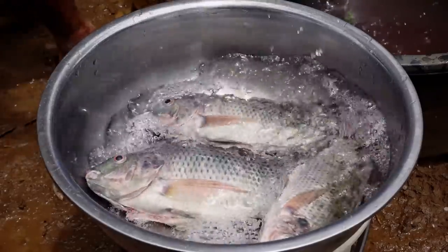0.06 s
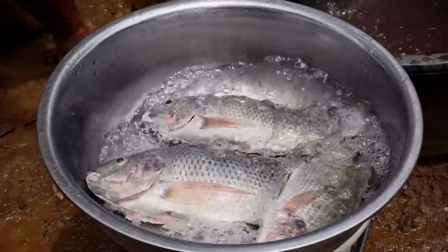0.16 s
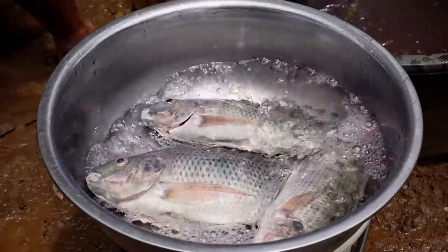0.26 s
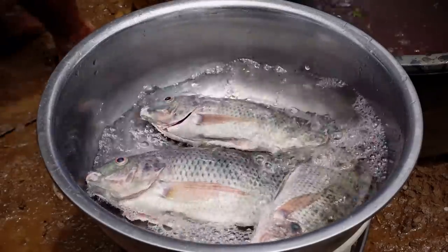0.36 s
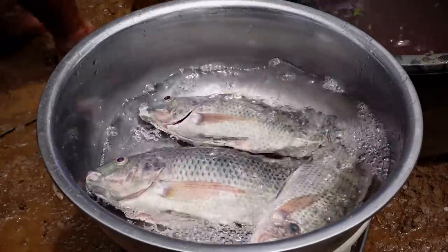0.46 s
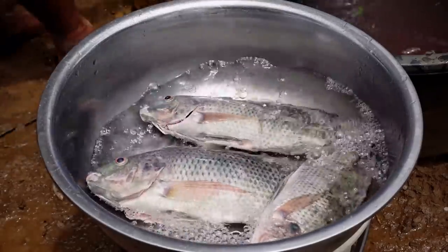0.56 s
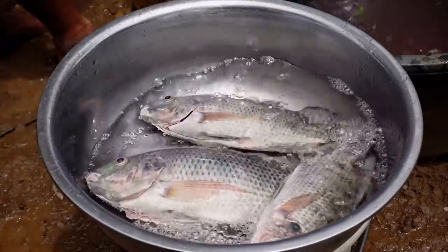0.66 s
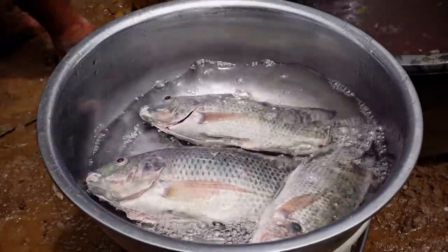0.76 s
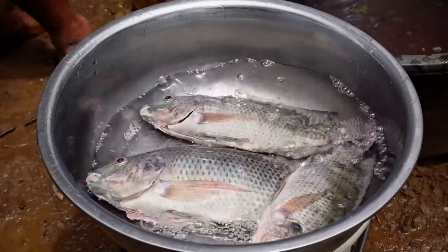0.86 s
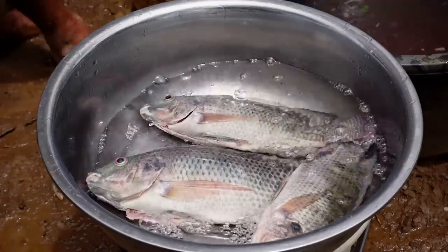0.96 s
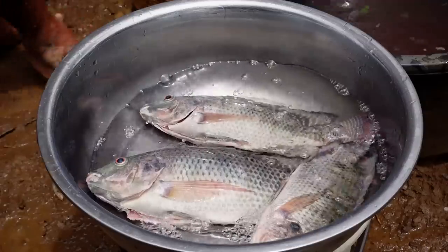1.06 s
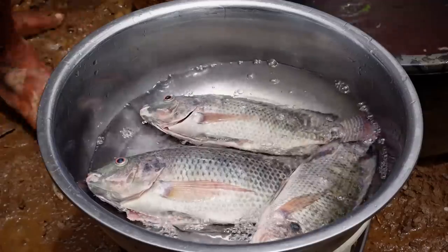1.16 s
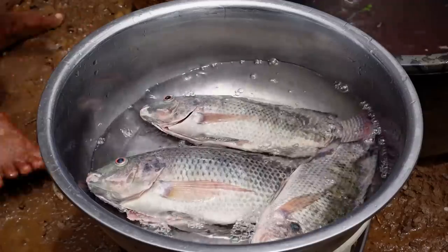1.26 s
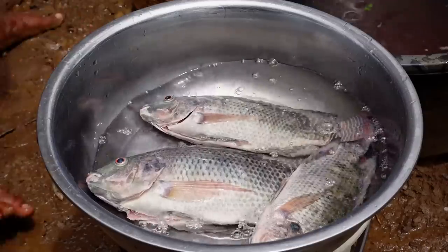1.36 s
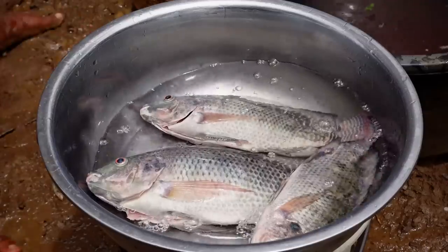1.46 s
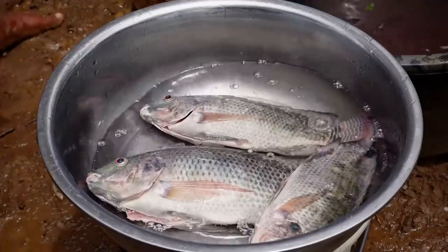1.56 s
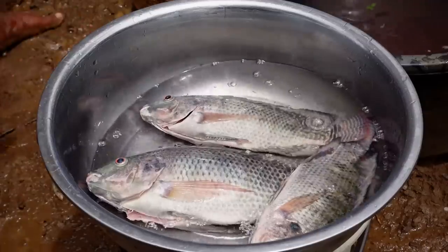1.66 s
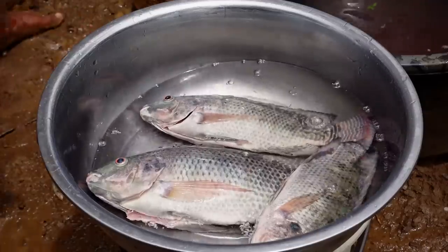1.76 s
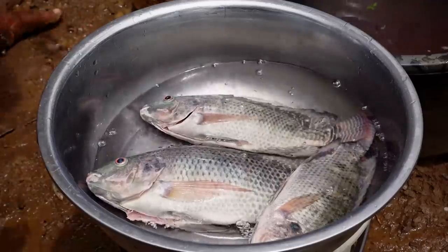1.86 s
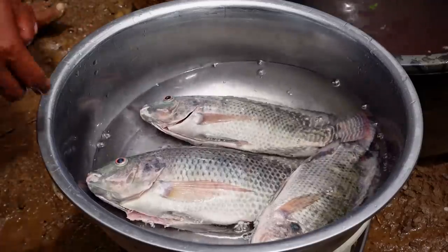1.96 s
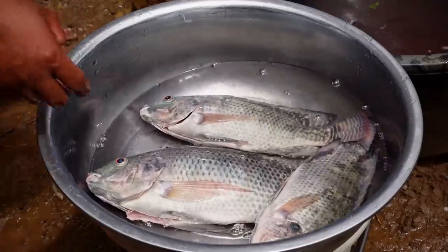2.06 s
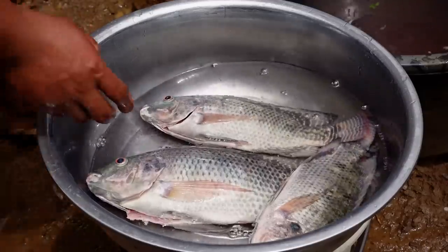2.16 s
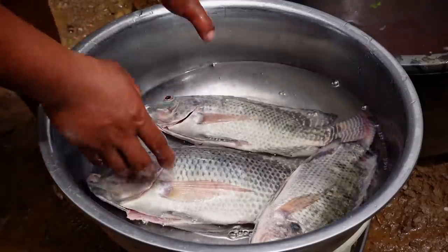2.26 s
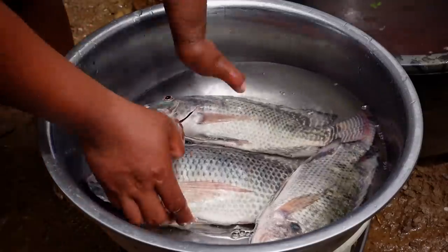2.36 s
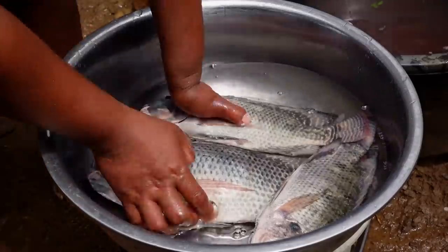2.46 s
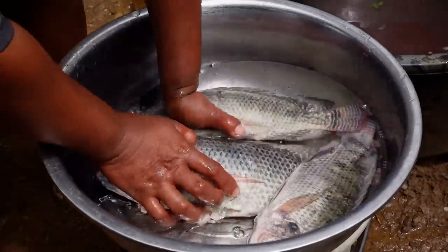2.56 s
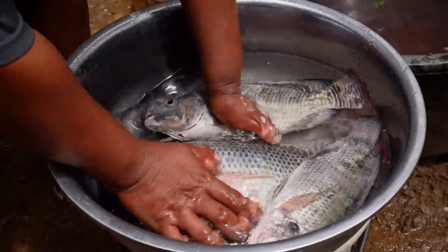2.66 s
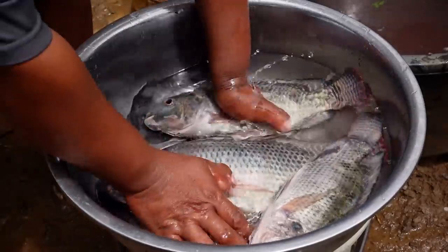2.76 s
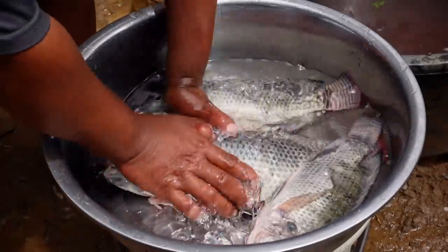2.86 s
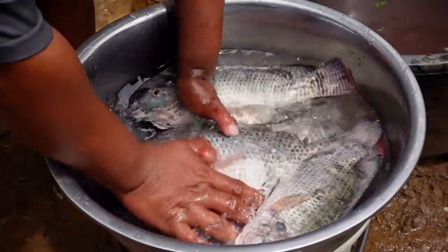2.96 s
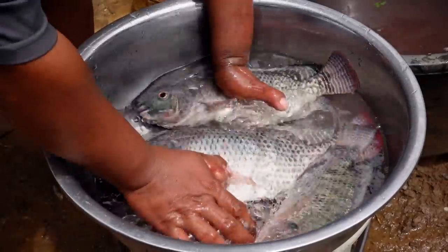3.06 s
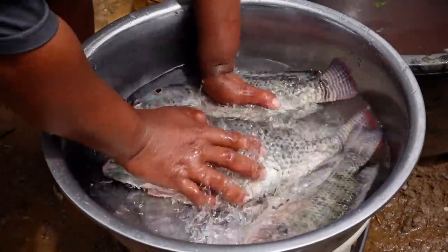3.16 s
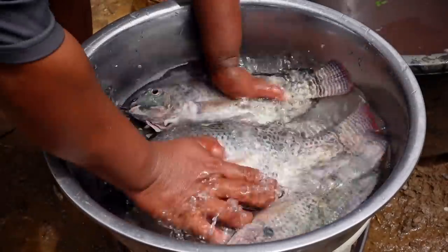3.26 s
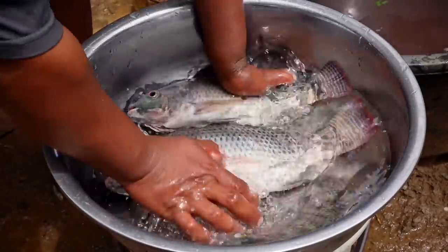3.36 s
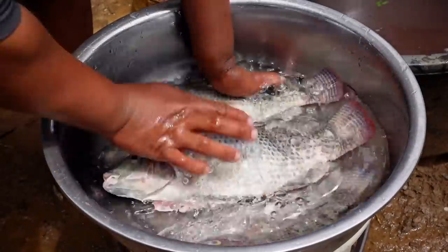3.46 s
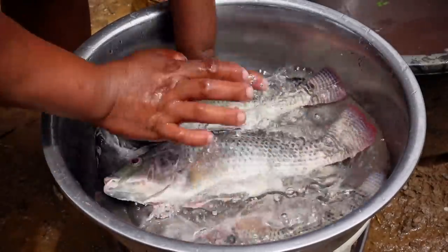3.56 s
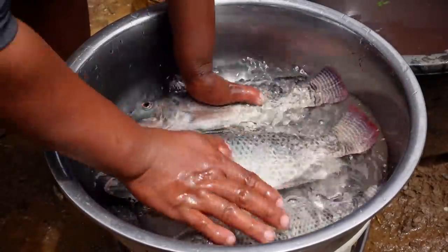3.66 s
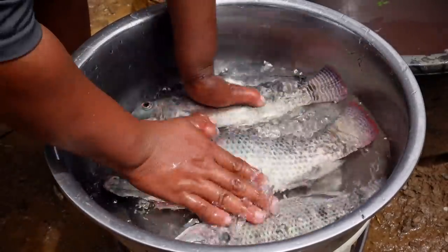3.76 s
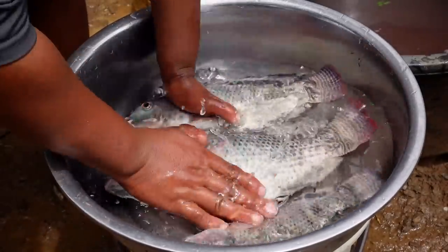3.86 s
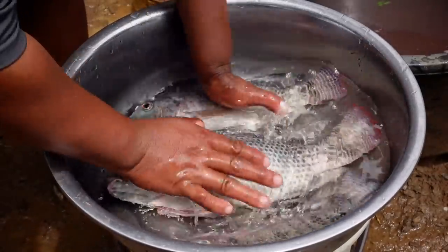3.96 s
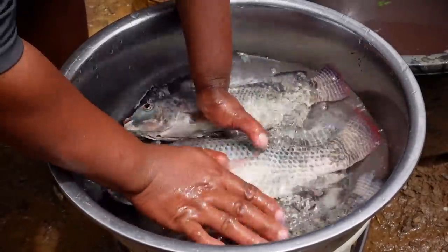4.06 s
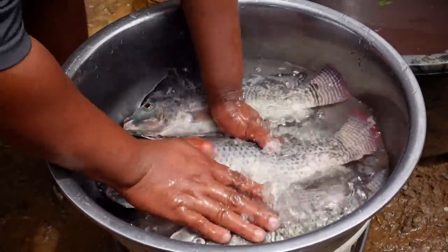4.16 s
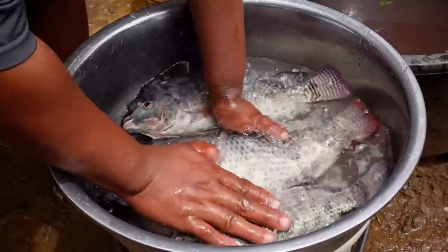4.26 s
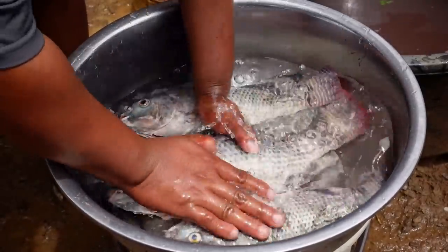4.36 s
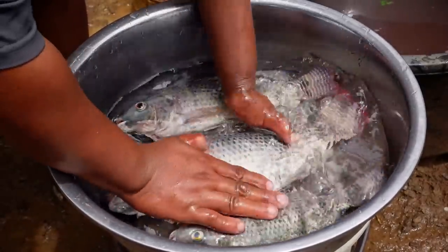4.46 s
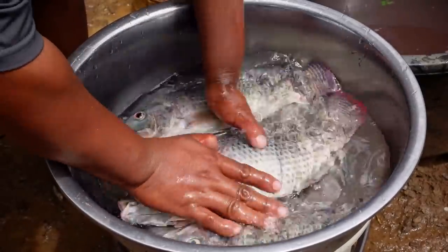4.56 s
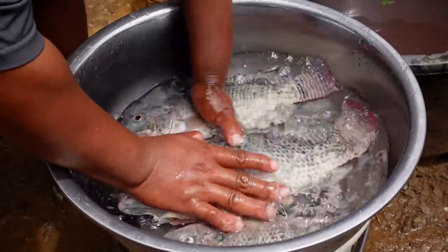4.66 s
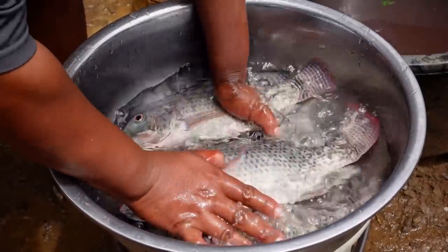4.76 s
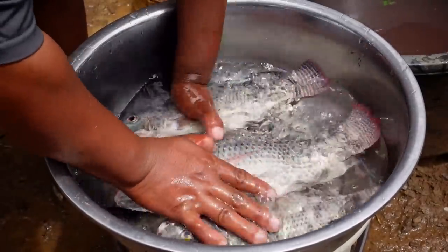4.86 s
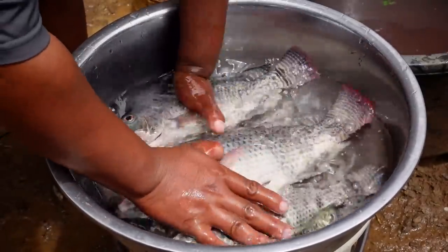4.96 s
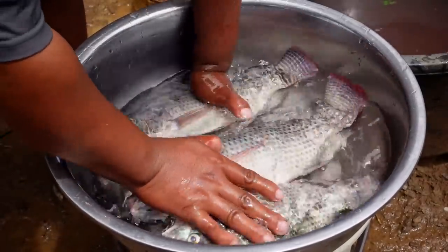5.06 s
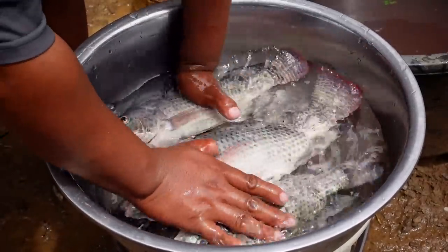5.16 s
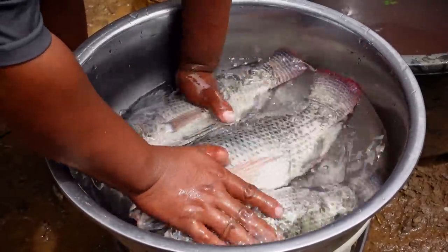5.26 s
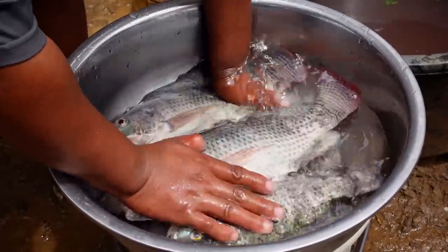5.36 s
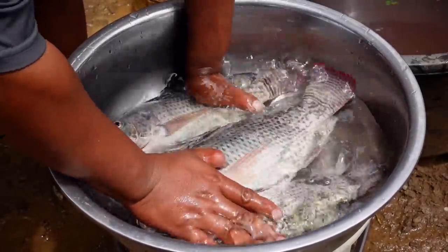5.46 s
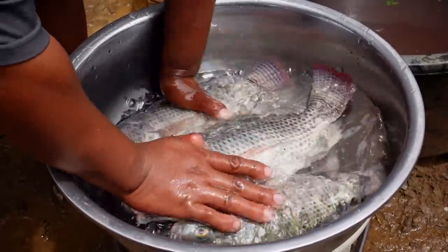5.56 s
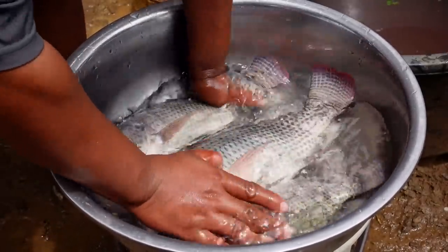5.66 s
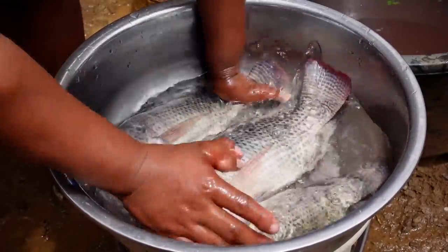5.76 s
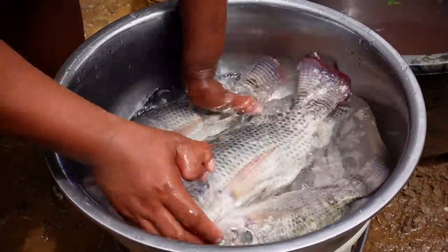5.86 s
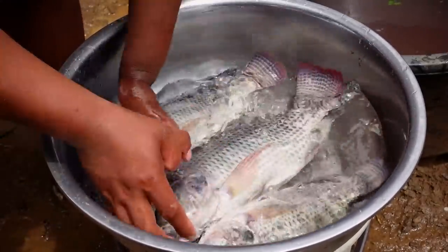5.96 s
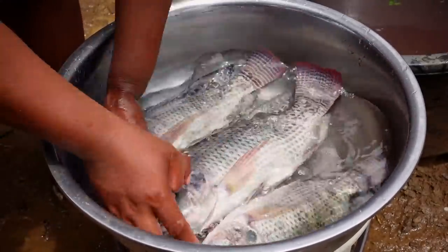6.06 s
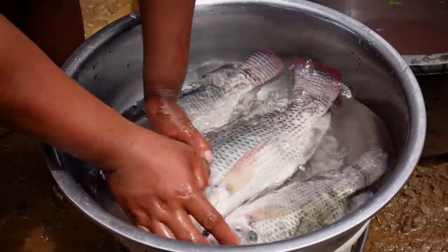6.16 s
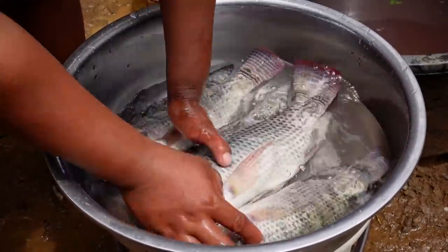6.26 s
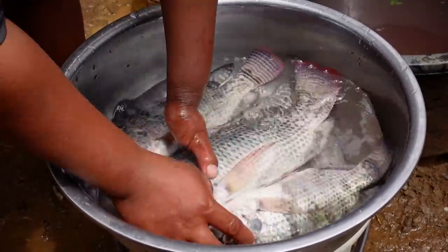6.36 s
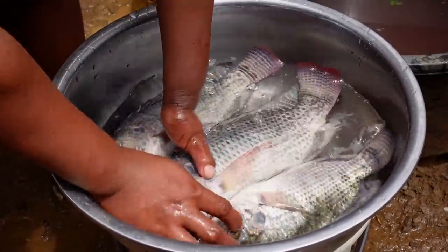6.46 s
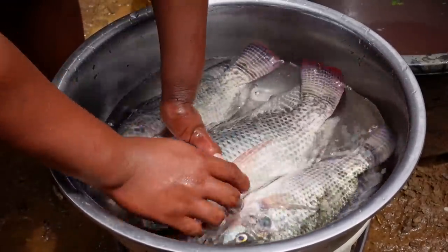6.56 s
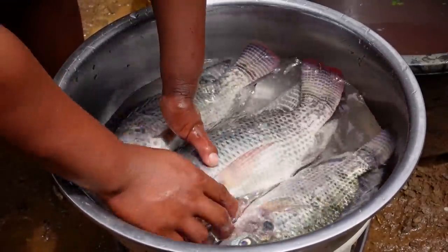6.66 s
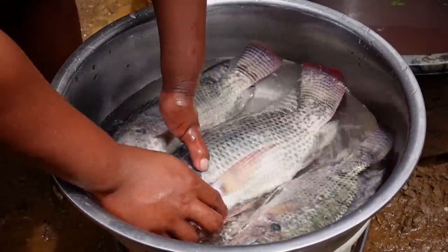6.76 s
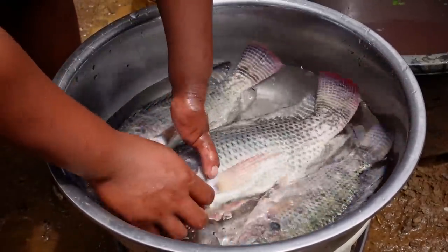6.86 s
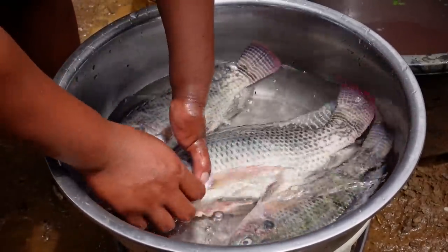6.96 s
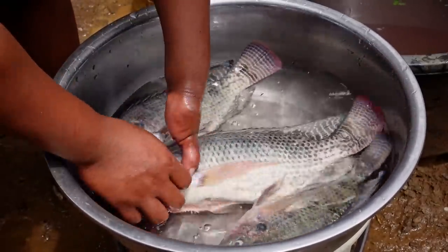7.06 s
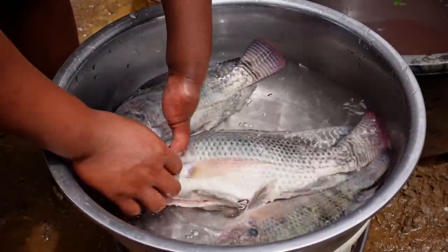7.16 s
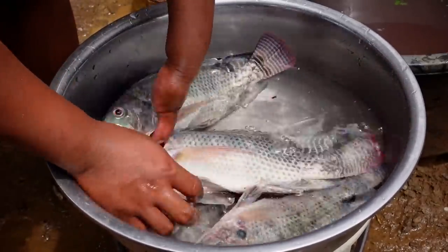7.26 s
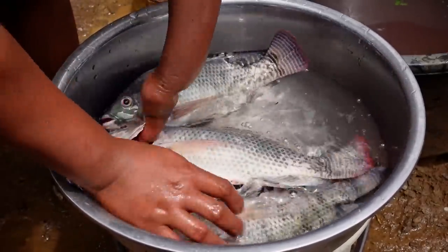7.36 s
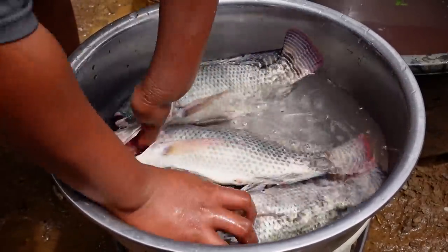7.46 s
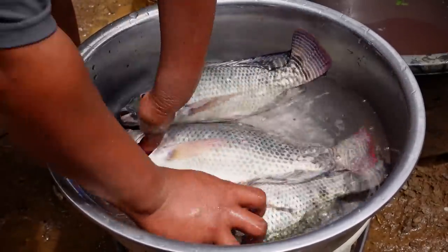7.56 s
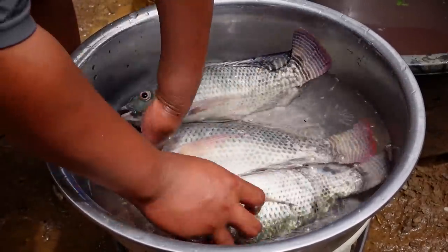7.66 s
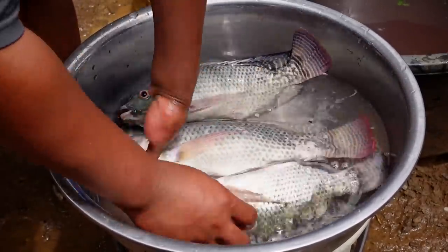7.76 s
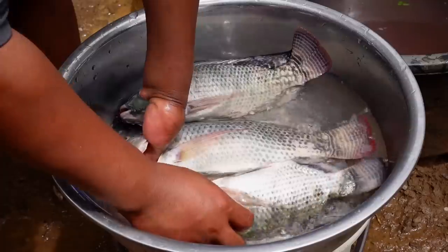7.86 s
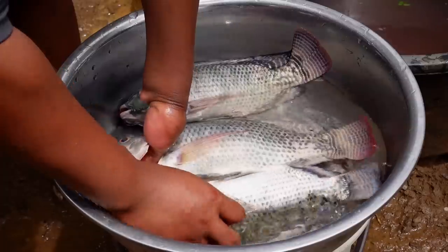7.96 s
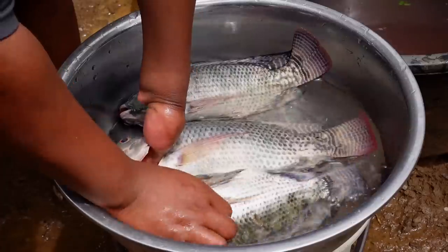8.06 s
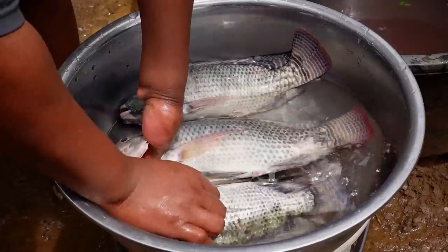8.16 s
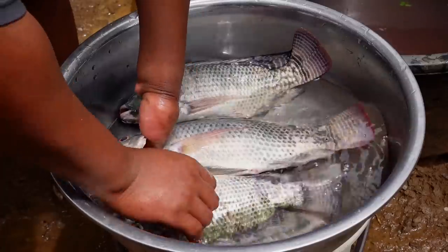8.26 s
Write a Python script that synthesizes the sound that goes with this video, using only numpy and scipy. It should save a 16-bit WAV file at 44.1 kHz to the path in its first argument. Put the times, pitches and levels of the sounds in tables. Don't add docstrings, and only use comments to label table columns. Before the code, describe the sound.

Wet slaps, bubbly splashes and plinking drips in a metal basin right at the microphone, while a rooster crows hoarsely nearby and a chick peeps.

```python
import sys
import numpy as np
from scipy import signal
from scipy.fft import rfft, irfft, next_fast_len
from scipy.io import wavfile
from scipy.ndimage import uniform_filter1d, minimum_filter1d, map_coordinates

SR = 44100
rng = np.random.default_rng(int(sys.argv[2]) if len(sys.argv) > 2 else 0)


def amp(db):
    return 10 ** (np.asarray(db, float) / 20)


def write(x):
    x = np.atleast_2d(x).T
    wavfile.write(sys.argv[1], SR, np.round(np.clip(x, -1, 1) * 32767).astype(np.int16))


N = 366471

# (frequency [Hz], density [dB per Hz])
RUMBLE = [(25, -45), (120, -22), (250, -6), (550, -2), (1300, -6), (2300, -11), (4000, -40)]
TRICKLE = [(350, -30), (700, -2), (1750, -2.5), (4000, -2.5), (9240, -15), (16000, -29)]
# (frequency [Hz], likeness [0-1])
ALIKE = [(60, .7), (400, .62), (1500, .84), (4000, .94), (15000, .98)]
# (frequency [Hz], t60 [s])
WALLS = [(500, .5), (2000, .35), (10000, .12)]
RUMBLE_DB, WATER_DB, POUR_DB, SETTLE_S = -54.5, -43.5, 8, .5
TURN_DOWN_S, TURN_DOWN_DB, FADE_DB_PER_S = 7.235, 6.5, 2.5
FOAM_DB, FOAM_LOSS_DB_PER_S, FOAM_HZ = -42, 2.1, 7500

# (time [s], level [dB])
PEEPS = [
    (.36, -41),
    (.79, -43),
    (6.2, -37.5),
    (6.68, -39),
    (7.09, -43),
    (7.54, -50),
    (7.98, -48),
]
PEEP_S, PEEP_HZ, PEEP_FALL_HZ, PEEP_TURN = .22, 4150, 420, .4

# (time [s], pitch [Hz], effort [dB], beak opening as second partial lift [dB])
CROW = [
    [(4.134, 586, -24, 1), (4.15, 610, -20, -1), (4.172, 705, -18, 0), (4.215, 760, -19, -1),
     (4.245, 710, -20, 4), (4.3, 685, -20, 4), (4.36, 700, -27, 12), (4.385, 700, -33, 8),
     (4.459, 660, -37, 6)],
    [(4.46, 575, -27, 2), (4.49, 800, -21, 13), (4.54, 840, -21, 15), (4.63, 825, -23, 7),
     (4.645, 785, -16, 5), (4.73, 780, -16, 7), (4.89, 756, -16, 7), (5.01, 750, -17, 9),
     (5.115, 725, -23, 6)],
    [(5.12, 800, -27, 4), (5.29, 780, -28, 5)],
    [(5.296, 678, -22, 1), (5.31, 688, -17, 3), (5.355, 712, -17, 2), (5.42, 712, -19, 4),
     (5.5, 697, -22, 3), (5.62, 674, -15, -9), (5.712, 638, -19, -13)],
    [(5.716, 540, -28, 0), (5.78, 505, -28, 4), (5.83, 497, -33, 2), (5.91, 485, -55, 0)],
]
# (time [s], hoarseness [0-1], flutter depth [0-1])
VOICE = [(4.13, .28, .2), (4.22, .27, .3), (4.26, .35, .9), (4.33, .35, .4), (4.37, .2, .3), (4.5, .27, .8),
         (4.6, .33, .6), (4.65, .12, .55), (4.72, .12, .6), (4.84, .25, .8), (4.89, .11, .85),
         (5.04, .12, .8), (5.08, .5, .6), (5.31, .24, .5), (5.41, .13, .2), (5.67, .07, .15),
         (5.73, .36, .3), (5.85, .27, .2)]
# (time [s], half length [s], hoarseness [0-1])
CRACKS = [
    (4.143, .018, .45),
    (4.295, .06, .6),
    (4.41, .045, .8),
    (4.485, .045, .55),
    (4.61, .04, .7),
    (4.79, .055, .55),
    (5.195, .105, .95),
]
# (frequency [Hz], gain [dB])
THROAT = [(1500, 5), (2100, -2), (2740, -5), (3020, 0), (3900, -8), (4700, -1), (5400, -7), (6200, -5),
          (7700, -6), (9000, -16), (14000, -40)]
# (frequency [Hz], density [dB per Hz])
BREATH = [(1180, -50), (2000, -20), (2190, -8), (3020, -22), (3640, 1), (4020, -13), (4610, 0), (5470, -14),
          (11000, -31), (14300, -52), (22000, -120)]
CHAOS = [(430, -60), (520, -7), (800, -5), (1050, 1), (1700, -3), (2200, -6), (2800, -5), (4400, -26)]
# (frequency [Hz], left minus right [dB])
BIRD_SIDE = [(200, -2), (700, -7.5), (1290, 0), (4400, -.8)]
OVERTONES_DB = [-24, -25, -31, -27.5, -35]
SHEEN_DB = [-10, -3, -6, -5, -8]
RASP_DB = [10, 4, 0, 1, 2]
HOLLOW_DB = [-2, -1, 0, -4, -3]
LOW_VOICE_DB = [-1, -3, -14]
LOW_VOICE_HZ, LOW_SPREAD_HZ = 615, 80
SHEEN_HZ, HOLLOW_HZ = (5300, 6500), (2200, 2600, 4300, 4600)
FOLLOW, BEAK_BRIGHTENS = .6, .3
CRACK_LOSS_DB, HALF_SHARE = 4, .7
FLUTTER_HZ, FLUTTER_BLUR = 41, .6
CHAOS_DB, THROAT_FLOOR_HZ = -1.5, 480
LINGER_S, LINGER_HZ, LINGER_DB = (5.705, 5.765, 5.87), (642, 615), (-18, -23, -42)

# (frequency [Hz], level [dB], t60 [s])
BASIN = [(392, -3, .13), (416, -3, .2), (560, -11, .12), (640, -9, .2), (705, -10, .18), (840, -8, .22),
         (945, -6, .07), (1065, -14, .2), (1325, -13, .25), (1745, -11, .15), (2250, -16, .1),
         (2700, -12, .2), (3120, -14, .14), (5450, -15, .08)]
# (time [s], level [dB])
KNOCKS = [
    (1.167, -10),
    (1.252, -29),
]
# (frequency [Hz], density [dB per Hz])
FROTH = [(250, -34), (600, -14), (1300, -4), (2500, -2), (5000, -4), (9000, -13.5), (16000, -25)]
# (start [s], crest [s], end [s], crest level [dB])
STIRS = [
    (0, .012, .1, -19),
    (1.17, 1.3, 1.72, -32),
    (2.2, 2.7, 2.9, -36),
    (2.8, 3.2, 3.56, -26),
    (3.5, 3.87, 4.12, -38),
    (5.95, 6.02, 6.3, -39),
    (6.3, 6.55, 6.78, -36),
    (7.38, 7.45, 7.88, -45),
]
# (crest time [s], level [dB], rise or fall by 10 dB [s], brightness [dB])
SURGES = [(1.26, -13, .014, 3), (1.444, -17, .018, 5), (1.862, -35, .018, 4), (2.456, -33, .02, 3),
          (2.66, -28, .06, 0), (2.8, -29, .03, -3), (2.9, -24, .03, -1), (3.178, -14, .026, -1),
          (3.25, -20, .05, -3), (3.47, -25, .07, 0), (6.562, -27, .045, -8), (6.644, -35, .026, 1),
          (7.74, -43, .06, 0), (7.785, -39, .035, 7), (8.22, -45, .06, -8)]
# (time [s], peak [dB], bubble pitch [Hz], fall by 10 dB [s])
SLAPS = [(.0513, -3, 5310, .013), (.1067, -2, 4200, .016), (.1565, -2.5, 4340, .02),
         (.3376, -11, 3590, .02), (1.1667, -2, 2710, .037), (1.2575, 1, 4510, .03), (1.3518, -4, 2760, .03),
         (1.4396, -5, 5120, .04), (1.7789, -6, 2730, .014), (1.9799, -15, 4260, .03),
         (2.7581, -13, 2810, .03), (2.9467, -6, 4820, .028), (3.0784, -3.5, 4480, .023),
         (3.1063, -7, 1990, .026), (3.2735, -4, 3130, .024), (3.3293, -4, 3180, .023),
         (3.6511, -7, 4740, .016), (3.8531, -6, 5530, .054), (3.8801, -10, 2540, .037),
         (3.915, -8, 2930, .048), (5.9952, -14, 5490, .03), (6.0905, -20, 2280, .032),
         (6.3384, -21, 4720, .029), (6.4896, -20, 2750, .015), (7.4184, -20, 5810, .022),
         (7.5861, -28, 4900, .05)]
# (time [s], peak [dB], pitch [Hz])
SPITS = [(.0253, -7, 3180), (.034, -7, 8500), (.065, -7, 9000), (.125, -10, 7500), (.166, -6, 7000),
         (1.7793, -2, 9500), (.2179, -9, 4070), (1.3289, -11.5, 3420), (1.4865, -5, 4580),
         (1.7544, -12, 2740), (3.1532, -7, 2790), (3.187, -3, 3900), (3.2141, -12, 3130),
         (3.243, -7.5, 2910), (3.6905, -15, 4820), (3.8362, -13.5, 5850), (3.9439, -13, 2940),
         (4.1933, -8, 6500), (5.2869, -12, 4460), (5.3877, -13, 3600), (5.4385, -3, 3100),
         (5.5009, -2, 2150), (5.5194, -6, 5800), (5.7279, -17, 2640), (5.9578, -19, 7220),
         (6.0286, -15, 2010)]
# (time [s], peak [dB], pitch [Hz])
DRIPS = [(2.382, -22, 3670), (2.7776, -13, 2290), (2.8674, -13, 6000), (2.8818, -.5, 2840),
         (2.9746, -10, 2080), (3.0664, -9, 4300), (3.3912, -2, 2160), (3.5264, -13.5, 2760),
         (4.0083, -3.5, 2290), (4.0087, -11, 2950), (4.2378, -9, 2160), (4.3934, -19, 2500),
         (4.4493, -6, 2200), (4.6932, -12, 5000), (4.8135, -10, 2760), (5.1402, -14, 5000),
         (6.0092, -13, 3430), (6.0431, -12, 3840), (6.062, -23, 2200), (6.08, -27, 7000),
         (6.163, -29, 8500), (6.238, -30, 7000), (6.492, -21, 8000), (6.592, -28, 10000),
         (6.648, -27, 3400), (6.793, -32, 5200), (6.848, -33, 11000), (.568, -29, 1300), (1.863, -22, 8900),
         (2.71, -24, 11000), (2.797, -22, 1350), (4.862, -20, 10500), (4.982, -22, 10000),
         (5.773, -20, 11000), (5.845, -24, 9300)]
# (time [s], peak [dB], pitch [Hz])
TICKS = [(.008, -10, 8500), (.0145, -11, 2600), (.0967, -15, 4150), (.1456, -13, 4120), (.1845, -17, 4970),
         (.19, -19, 12000), (.2249, -18, 8000), (.243, -22, 9500), (.2743, -23, 6500), (.3466, -22, 7110),
         (.3671, -25, 7490), (.386, -25, 6000), (.4289, -25, 11000), (.559, -25, 11500), (.592, -24, 9500),
         (.6679, -27, 5780), (1.263, -3, 5500), (1.3384, -12, 3700), (1.5689, -21, 4060),
         (1.6243, -26, 7960), (1.6502, -27, 4120), (1.7245, -19, 4200), (1.736, -21, 4190),
         (1.959, -22, 4200), (2.0733, -25, 6110), (2.6028, -16, 9000), (2.6477, -21, 4330),
         (2.7974, -21, 4090), (2.9001, -15, 6000), (2.9286, -14, 8500), (3.0368, -17, 7000),
         (3.1925, -2, 4100), (3.2628, -8, 5300), (3.2858, -6, 4450), (3.3, -13, 7500), (3.315, -16, 8500),
         (3.3806, -12, 8600), (3.4279, -17, 4310), (3.4514, -20, 3990), (3.4639, -14, 9000),
         (3.6305, -12, 11400), (3.7098, -19, 4420), (3.7992, -24, 6510), (3.8152, -17, 2500),
         (3.896, -17, 5800), (4.0212, -26, 7000), (4.0362, -19, 5200), (4.079, -22, 3850),
         (4.2642, -16, 9200), (4.3445, -18, 6400), (4.77, -19, 7700), (4.84, -14, 3200), (5.232, -24, 6600),
         (5.54, -17, 900), (5.733, -14, 5000), (5.885, -27, 8000), (6.985, -33, 4000), (7.05, -31, 6200),
         (7.685, -34, 2800), (7.885, -38, 5200)]
# (time [s], peak [dB], pitch [Hz])
PLOPS = [(1.264, -21, 560), (2.278, -32, 500), (2.295, -28, 850), (2.33, -33, 700), (1.351, -14, 1500),
         (1.437, -15, 1400), (1.7793, -9, 1600), (2.771, -19.5, 1800), (2.947, -15.5, 1420),
         (2.969, -19, 1850), (3.027, -15, 945), (3.078, -10, 1270), (3.107, -15.5, 1830), (3.15, -4.5, 969),
         (3.171, -7.5, 1430), (3.287, -8.5, 1800), (3.381, -19, 1850), (3.403, -8, 1820),
         (3.644, -20.5, 1570), (3.915, -16, 1380),
         (6.371, -24, 950), (6.46, -24, 832), (6.501, -14.5, 614), (6.553, -16, 1000),
              (6.537, -22, 950), (6.647, -26, 3400), (6.731, -31, 568), (7.972, -15.5, 1890),
         (2.897, -15, 3750), (2.925, -22, 2600), (3.044, -19, 1300), (3.158, -17, 580),
            (3.168, -12, 930), (3.177, -12, 5000), (3.18, -11, 3700), (3.187, -8, 2100), (3.214, -16, 1450),
            (3.228, -15, 1950), (3.25, -20, 900), (3.264, -14, 2450), (3.276, -13, 5500), (3.33, -9, 3100),
            (3.333, -21, 900), (3.391, -17, 850), (5.327, -22, 2250), (5.29, -21, 2850), (5.446, -17, 2200),
            (6.364, -29, 1400), (6.372, -27, 500), (6.503, -24, 1850)]
# (time [s], level [dB], start pitch [Hz], end pitch [Hz], length [s])
GLUG = [(.2185, -16.5, 590, 1720, .063), (.245, -31, 840, 860, .06), (1.56, -40, 1000, 1030, .11),
        (1.755, -33, 560, 600, .035), (2.83, -27, 900, 1080, .03), (2.965, -29, 760, 960, .06),
        (3.058, -17, 4150, 4300, .016), (5.5005, -9, 1750, 2000, .009), (3.366, -24, 2230, 2260, .018),
        (4.088, -35, 4800, 5120, .045), (6.98, -44, 3500, 3530, .05)]
# (frequency [Hz], level [dB])
GURGLE = [(950, -5), (1480, 0), (2250, -13), (2850, -6), (3900, -14)]
GURGLE_S, GURGLE_DB, GURGLE_ARCH = (6.515, 6.565, 6.615), -26, .08
STIR_EDGE_DB = 9
SPLASH_UNDER_DB, BRIGHT_DB_PER_OCTAVE, NEUTRAL_HZ = 12, 9, 3000
CALM_S, SUDDEN_RISE_S, SPLASH_RISE_S = .0945, .0009, .006
SCRUB_S, BUBBLY, SMOOTH = (2.6, 4.1), 1.05, .45
WALL_RING_DB = -8.5
SLAP_SPRAY_DB, SPIT_SPRAY_DB, DRIP_SPRAY_DB, TICK_SPRAY_DB = -18, -17, -29, -21
SNAP_DB, SNAP_T60_S, SNAP_TOP_HZ = -4, .0025, 9000
SNAP_FOLLOWS = .6
TOP_HZ = 15900


def unit(x):
    return x / np.sqrt(np.mean(np.abs(x) ** 2) + 1e-20)


def along(points, hz):
    f, v = np.transpose(points)
    return np.interp(np.log(hz + 1), np.log(f + 1), v)


def curves(rows):
    s, *cols = np.transpose(rows)
    return [np.interp(np.arange(N) / SR, s, c) for c in cols]


def inside(spans):
    t = np.arange(N) / SR
    is_open = sum((t >= rows[0][0]) & (t < rows[-1][0]) for rows in spans)
    return uniform_filter1d(1. * is_open, size=180)


def wobble(rate_hz, size=N):
    knots = rng.standard_normal(size // 24 + 8)
    return map_coordinates(knots, [np.arange(size) * rate_hz / SR], order=2)


def complex_wobble(rate_hz, size=N):
    return unit(wobble(rate_hz, size=size) + 1j * wobble(rate_hz, size=size))


def filtered(x, response):
    m = next_fast_len(N + 8192)
    return irfft(rfft(x, m) * response(np.fft.rfftfreq(m, 1 / SR)), m)[..., :N]


def rush(spectrum, patchy_db):
    z = signal.stft(rng.standard_normal((2, N)), nperseg=512)[2]
    field = uniform_filter1d(rng.standard_normal(z.shape[1:]), size=6, axis=0)
    field = uniform_filter1d(field, size=8, axis=1)
    pair = signal.istft(z * amp(patchy_db * unit(field)), nperseg=512)[1][:, :N]

    def mid_side(hz):
        turn = np.arccos(np.clip(along(ALIKE, hz), 0, 1)) / 2
        return amp(along(spectrum, hz)) * [np.cos(turn), np.sin(turn)]

    mid, side = filtered(pair, mid_side)
    return unit(np.array([mid + side, mid - side]))


def bubbles(s, gain, hz, t60, rise, size):
    t = np.arange(size) / SR
    life = t / t60[:, None]
    ring = np.sin(2 * np.pi * hz[:, None] * t * (1 + rise * np.minimum(life, 1)))
    ring *= gain[:, None] * amp(-60 * life) * np.minimum(t * hz[:, None], 1)
    at = (s * SR).astype(int)[:, None] + np.arange(size)
    return np.bincount(at.ravel(), ring.ravel(), N + size)[:N]


def swarm_draw(count, centre_hz, spread, low_hz, high_hz):
    s = rng.uniform(0, N / SR, size=count)
    draw = rng.standard_normal((count, 2))
    hz = np.clip(centre_hz * np.exp(spread * draw[:, 0]), low_hz, high_hz)
    return s, hz, draw[:, 1]


def echoes(x):
    hz, t, z = signal.stft(rng.standard_normal((2, SR // 2)), SR, nperseg=256)
    tail = signal.istft(z * amp(-60 * t / along(WALLS, hz)[:, None]), SR, nperseg=256)[1]
    late = np.pad(x, (300, 0))[None]
    return signal.fftconvolve(late, tail / np.linalg.norm(tail[0]), axes=1)[:, :N]


def yard():
    t = np.arange(N) / SR
    down_db = (t > TURN_DOWN_S) * (TURN_DOWN_DB + FADE_DB_PER_S * (t - TURN_DOWN_S))
    rumble_db = RUMBLE_DB - 1.2 * down_db
    water_db = WATER_DB + POUR_DB * np.exp(-t / SETTLE_S) - down_db
    s, hz, deviate = swarm_draw(2500, 5000, .5, 800, 15000)
    fizz = unit(bubbles(s, amp(6 * deviate), hz, 12 / hz, rise=.2, size=300))
    water = amp(water_db + 0.51 + .8 * wobble(9)) * (rush(TRICKLE, patchy_db=2.2) + .2 * fizz)
    return water + amp(rumble_db + 8 + 1.2 * wobble(6)) * rush(RUMBLE, patchy_db=1.5)


def foam():
    s, hz, deviate = swarm_draw(14000, FOAM_HZ, .35, 3000, 15500)
    now = np.arange(N) / SR
    pops = unit(bubbles(s, amp(2.5 * deviate), hz, 18 / hz, rise=.2, size=110))
    return amp(FOAM_DB - FOAM_LOSS_DB_PER_S * now - TURN_DOWN_DB * (now > TURN_DOWN_S)) * pops


def chick():
    out = np.zeros(N + SR)
    u = np.linspace(0, 1, int(PEEP_S * SR))
    for s, db in PEEPS:
        hz = PEEP_HZ - PEEP_FALL_HZ / (1 + np.exp((PEEP_TURN - u) / .08))
        hz = hz * rng.normal(1, .01) + 35 * wobble(120, size=len(u))
        husk = amp(db + 2 - 9 * np.maximum(u - PEEP_TURN, 0) + 4 * wobble(140, size=len(u)))
        envelope = husk * np.minimum(7 * u, 1) * np.sqrt(1 - u)
        out[round(s * SR):][:len(u)] += envelope * np.sin(2 * np.pi * np.cumsum(hz) / SR)
    return amp(-7) * out[:N] + amp(-1.5) * echoes(out[:N])


def voice_controls():
    rows = []
    for note, crest_db, *colour_db in zip(CROW, OVERTONES_DB, SHEEN_DB, RASP_DB, HOLLOW_DB):
        s, pitch, effort_db, beak_db = np.transpose(note)
        loud_db = effort_db + BEAK_BRIGHTENS * np.maximum(beak_db, 0)
        upper_db = crest_db + FOLLOW * (loud_db - loud_db.max())
        colours = np.outer(colour_db, np.ones(len(s)))
        rows += zip(s, pitch, effort_db, effort_db + beak_db, upper_db, *colours)
    pitch, first_db, second_db, upper_db, sheen_db, rasp_db, hollow_db = curves(rows)
    hoarse, flutter = curves(VOICE)
    t = np.arange(N) / SR
    for s, lasts, depth in CRACKS:
        broken = np.exp(-((t - s) / lasts) ** 4)
        hoarse = np.maximum(hoarse, depth * broken)
        second_db = second_db - CRACK_LOSS_DB * broken * (lasts < .05)
    flutter = flutter * (1 - hoarse ** 4)
    half = HALF_SHARE * hoarse ** 2
    return pitch, first_db, second_db, upper_db, sheen_db, rasp_db, hollow_db, hoarse, flutter, half


def low_voice(pitch, hoarse, loud):
    n = len(pitch)
    hz = np.minimum(LOW_VOICE_HZ, pitch) * (1 + .03 * wobble(20, size=n))
    phase = 2 * np.pi * np.cumsum(hz) / SR
    share = hoarse ** 1.25 * (1 - .7 * hoarse ** 2) * loud
    out = np.zeros(n)
    for k, level_db in enumerate(LOW_VOICE_DB):
        smear = complex_wobble(LOW_SPREAD_HZ, size=n)
        out += share * amp(level_db + 4) * np.real(smear * np.exp(1j * (k + 1) * phase))
    return out


def lingering_tone(t):
    phase = 2 * np.pi * np.cumsum(np.interp(t, LINGER_S[::2], LINGER_HZ)) / SR
    return (t > LINGER_S[0]) * amp(np.interp(t, LINGER_S, LINGER_DB) + 3) * np.sin(phase)


def rooster():
    span = slice(int(CROW[0][0][0] * SR), int(CROW[-1][-1][0] * SR))
    controls = [c[span] for c in voice_controls()]
    pitch, first_db, second_db, upper_db, sheen_db, rasp_db, hollow_db, hoarse, flutter, half = controls
    n = len(pitch)
    phase = 2 * np.pi * np.cumsum(pitch * (1 + .012 * hoarse * wobble(150, size=n))) / SR
    beat = 1 + flutter * np.sin(2 * np.pi * np.cumsum(FLUTTER_HZ + 4 * wobble(9, size=n)) / SR)
    beat /= np.sqrt(1 + flutter ** 2)
    voice = np.zeros(n)
    for k in np.r_[1:19, 1.5:8]:
        hz = k * pitch
        if k < 1.2:
            level_db = first_db
        elif k < 2.2:
            level_db = second_db
        else:
            level_db = upper_db - 3 - 2.5 * hoarse + along(THROAT, hz)
            level_db = level_db + sheen_db * np.interp(hz, SHEEN_HZ, [0, 1])
        level_db = level_db + hollow_db * np.interp(hz, HOLLOW_HZ, [0, 1, 1, 0])
        smear = complex_wobble(70 + 50 * k, size=n)
        fading = amp(2.5 * np.sqrt(k) * np.minimum(wobble(26, size=n), .8))
        clear = (1 - hoarse) ** (.15 + 2.8 * hoarse * k)
        clear = clear * np.exp(-FLUTTER_BLUR * flutter ** 2 * max(k - 2, 0))
        tone = np.sqrt(clear) * beat * fading
        noise = np.sqrt(1 - clear) * smear * (1 - .55 * hoarse ** 2)
        share = 1 if k % 1 == 0 else half
        carrier = np.exp(1j * (k * phase + rng.uniform(0, 7)))
        voice += share * amp(level_db + 2.9) * np.real((tone + noise) * carrier)
    loud = amp(np.maximum(first_db, second_db - 6))
    voice += low_voice(pitch, hoarse, loud)
    voice += hoarse ** 1.15 * loud * amp(CHAOS_DB) * rush(CHAOS, patchy_db=4)[0][span]
    voice += lingering_tone(np.arange(span.start, span.stop) / SR)
    rasp = rush(BREATH, patchy_db=2.5)[0][span]
    out = np.zeros(N)
    out[span] = voice + np.sqrt(hoarse) * beat * amp(upper_db + rasp_db - 1.5) * rasp
    out = filtered(out * inside(CROW), lambda hz: 1 / (1 + (THROAT_FLOOR_HZ / (hz + 1)) ** 12))
    near = filtered(out, lambda hz: amp(along(BIRD_SIDE, hz) * [[.5], [-.5]]))
    return near + amp(-10.5) * echoes(out)


def basin():
    out = np.zeros(N + SR)
    t = np.arange(SR // 2) / SR
    for s, db in KNOCKS:
        ring = np.zeros(len(t))
        for hz, level, t60 in BASIN:
            ring += amp(level - 60 * t / t60 + 2.5 * wobble(60, size=len(t))) * np.sin(2 * np.pi * hz * t)
        attack = 1 - np.exp(-t / .007)
        out[round(s * SR):][:len(t)] += amp(db) * ring * attack * amp(2.5 * wobble(140, size=len(t)))
    return out[:N]


def bowl(x):
    def response(f):
        total = 0
        for k, (hz, db, t60) in enumerate(BASIN):
            damping = 1j * f * np.log(1000) / np.pi / t60
            total = total + (-1) ** k * amp(db / 2) * damping / (hz * hz - f * f + damping)
        return total

    return filtered(x, response)


def stirring():
    t = np.arange(N) / SR
    strokes = np.zeros(N)
    for start, crest, end, db in STIRS:
        below_db = np.interp(t, [start, crest, end], [STIR_EDGE_DB, 0, STIR_EDGE_DB])
        strokes += ((t >= start) & (t < end)) * amp(2 * (db - below_db))
    return uniform_filter1d(strokes, size=180)


def splashes():
    s, db, hz, fall = np.transpose(SLAPS)
    rise = np.where(np.diff(s, prepend=0) > CALM_S, SUDDEN_RISE_S, SPLASH_RISE_S)
    bright_db = BRIGHT_DB_PER_OCTAVE * np.log2(hz / NEUTRAL_HZ)
    slapped = [*zip(s, db - SPLASH_UNDER_DB, rise, fall, bright_db)]
    return slapped + [(at, level_db, lasts, lasts, bright) for at, level_db, lasts, bright in SURGES]


def slosh():
    s, hz, deviate = swarm_draw(4500, 3500, .6, 1300, 14000)
    swarm = bubbles(s, amp(4 * np.minimum(deviate, 1.6)), hz, 40 / hz, rise=.1, size=640)
    froth = amp(2 * wobble(60) + 2.8 * wobble(350)) * rush(FROTH, patchy_db=3)
    now = np.arange(N) / SR
    air = np.where((now > SCRUB_S[0]) & (now < SCRUB_S[1]), BUBBLY, SMOOTH)
    water = air * unit(swarm) + unit(froth) + amp(WALL_RING_DB) * unit(bowl(froth))
    water = water / np.sqrt(1 + air ** 2)
    dull = filtered(water, lambda f: 1 / (1 + (f / 3200) ** 4))
    power = np.tile(np.abs(stirring()) * amp(-9), (2, 1))
    t = np.arange(-SR // 8, SR // 2) / SR
    for at, db, rise, fall, bright_db in splashes():
        surge = amp(2 * (db - 2.5 - 10 * np.maximum(-t / rise, t / fall)))
        share = 1 / (1 + amp(2 * bright_db))
        first = round(at * SR) - SR // 8
        here = power[:, max(first, 0):first + len(t)]
        here += np.outer([share, 1 - share], surge[max(-first, 0):][:here.shape[1]])
    return np.sqrt(power[0]) * unit(dull) + np.sqrt(power[1]) * unit(water - dull)


def gurgle():
    t = np.arange(N) / SR
    swell = np.interp(t, GURGLE_S, [0, 1, 0])
    phase = 2 * np.pi * np.cumsum(1 + GURGLE_ARCH * swell) / SR
    tones = sum(amp(db) * np.real(complex_wobble(260) * np.exp(1j * hz * phase)) for hz, db in GURGLE)
    return amp(GURGLE_DB + 3 * wobble(110)) * np.sqrt(swell) * tones


def glug():
    out = np.zeros(N + SR)
    for s, db, low_hz, high_hz, lasts in GLUG:
        u = np.linspace(0, 1, int(lasts * SR))
        pitch = low_hz + (high_hz - low_hz) * u ** 1.4
        fade = amp(db - 11 * u) * np.sqrt(1 - u ** 6) * np.minimum(40 * u, 1)
        out[round(s * SR):][:len(u)] += fade * np.sin(2 * np.pi * np.cumsum(pitch) / SR)
    return out[:N]


def spray_bursts(s, level_db):
    out = np.zeros(N + SR)
    t = np.arange(900) / SR
    for at, db in zip(s, level_db):
        grit = amp(4 * wobble(500, size=len(t))) * rng.standard_normal(len(t))
        envelope = amp(db + 10 - 60 * t / .011) * (1 - np.exp(-t / .00012))
        out[round(at * SR):][:len(t)] += envelope * grit
    return filtered(out[:N], lambda f: amp(along(FROTH, f) + 9) * f / np.hypot(f, 2200))


def film_snaps(s, level_db):
    out = np.zeros(N + SR)
    t = np.arange(900) / SR
    for at, db in zip(s, level_db):
        tear = np.diff(rng.standard_normal(len(t) + 1)) / 2
        out[round(at * SR):][:len(t)] += amp(db + SNAP_DB - 60 * t / SNAP_T60_S) * tear
    return filtered(out[:N], lambda f: 1 / (1 + (f / SNAP_TOP_HZ) ** 4))


def drops():
    kinds = [(SLAPS, SLAP_SPRAY_DB), (SPITS, SPIT_SPRAY_DB), (DRIPS, DRIP_SPRAY_DB), (TICKS, TICK_SPRAY_DB)]
    contacts = [(*row[:3], kind_db) for rows, kind_db in kinds for row in rows]
    s, db, hz, spray_db = np.transpose(contacts)
    small_gain = amp(db - .35 * np.maximum(spray_db + 28, 0))
    small = bubbles(s, small_gain, hz, 38 / hz + .004, rise=.11, size=1200)
    spray = spray_bursts(s, db + np.minimum(spray_db, -13))
    snap = film_snaps(s, db + SNAP_FOLLOWS * (spray_db - SPIT_SPRAY_DB))
    s, db, hz = np.transpose(PLOPS)
    large = bubbles(s, amp(db), hz, 23 / hz + .012, rise=.06, size=5000)
    return small + large + snap + spray


def scene():
    background = yard() + foam() + chick() + rooster()
    close = basin() + gurgle() + glug() + drops()
    return background + slosh() + close * amp([[-.2], [.2]]) + amp(-20) * echoes(close)


def limited(x):
    need = np.minimum(1, 1.05 / (np.abs(x).max(axis=0) + 1e-9))
    return x * uniform_filter1d(minimum_filter1d(need, size=160), size=80)


def band_limit(x):
    return signal.sosfilt(signal.butter(12, 17090, fs=SR, output="sos"), x)


def record(dry):
    held = np.clip(limited(dry), -1, 1)
    finished = filtered(held, lambda hz: (hz < TOP_HZ) * hz ** 2 / (hz ** 2 + 40. * 40.))
    return band_limit(finished)


dry = scene()
out = record(dry)
write(out)
```